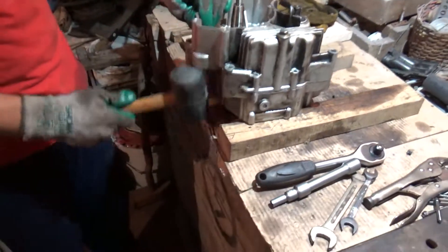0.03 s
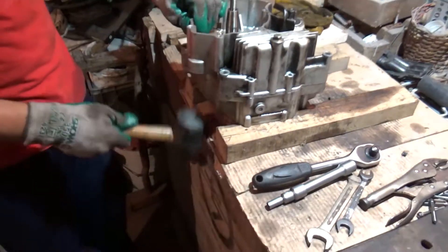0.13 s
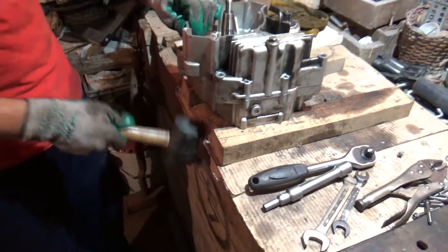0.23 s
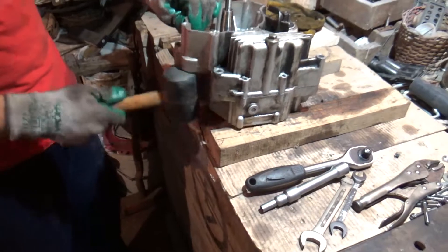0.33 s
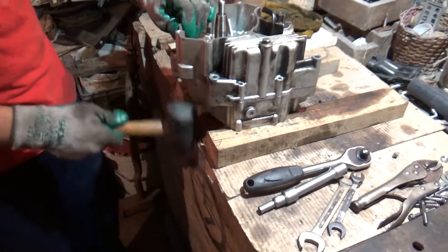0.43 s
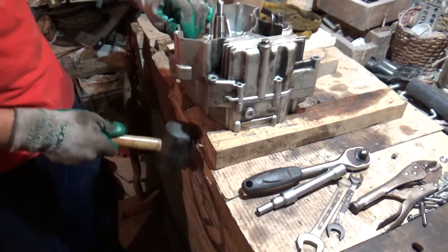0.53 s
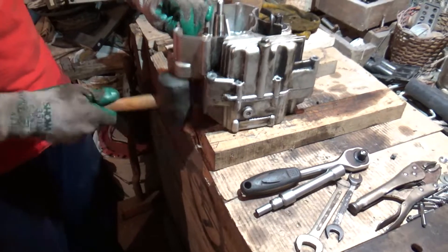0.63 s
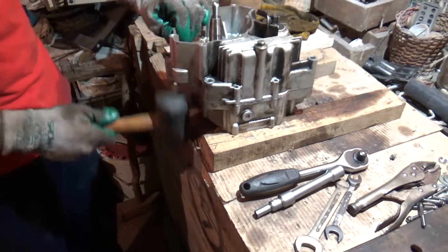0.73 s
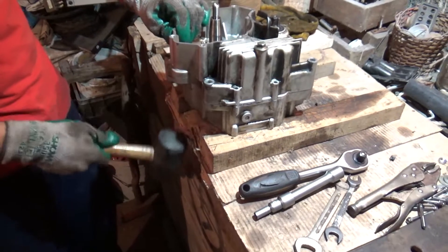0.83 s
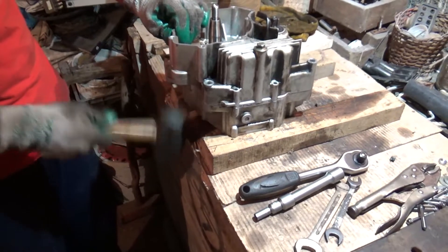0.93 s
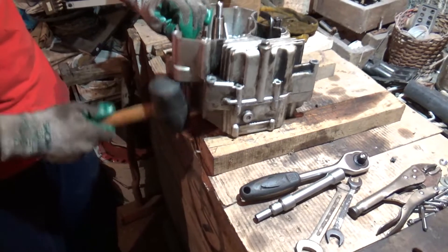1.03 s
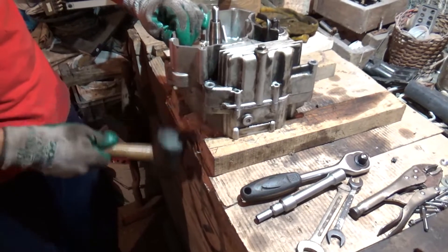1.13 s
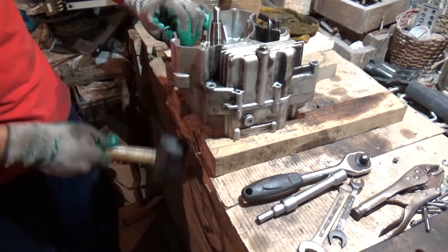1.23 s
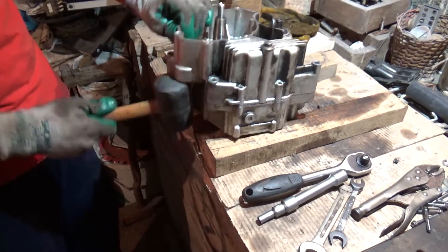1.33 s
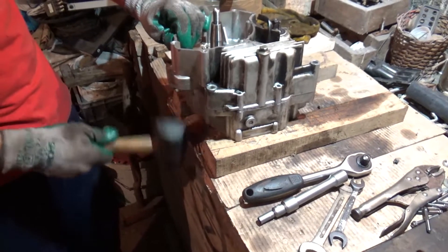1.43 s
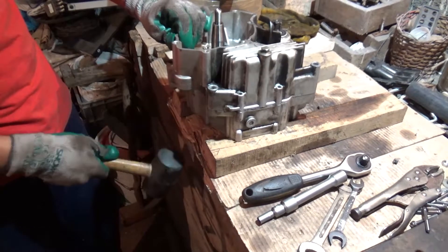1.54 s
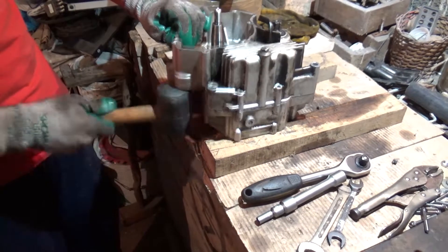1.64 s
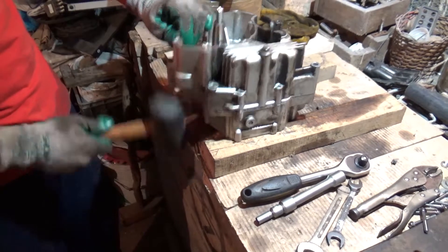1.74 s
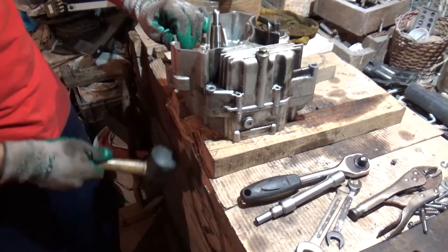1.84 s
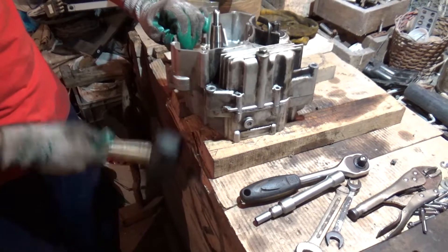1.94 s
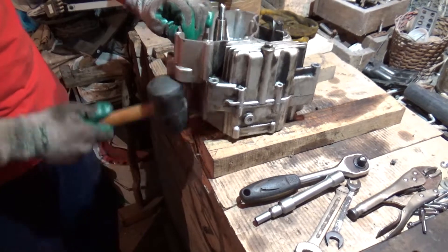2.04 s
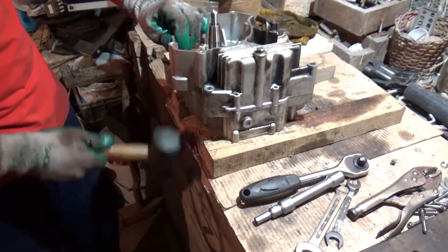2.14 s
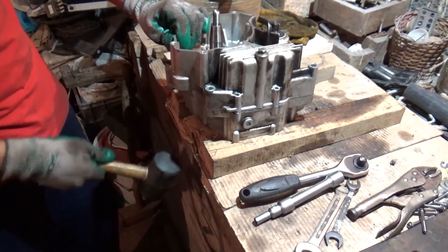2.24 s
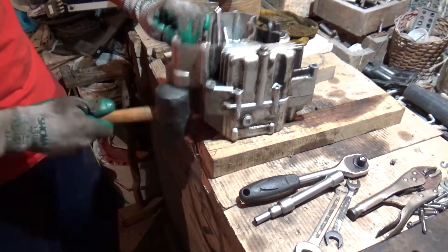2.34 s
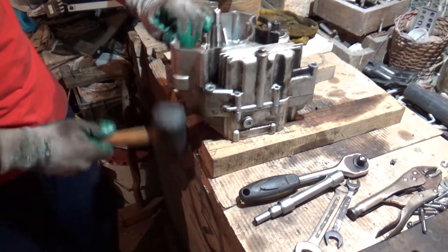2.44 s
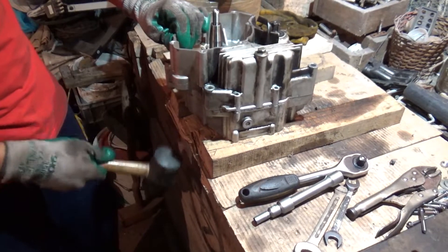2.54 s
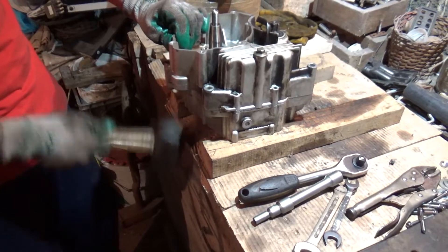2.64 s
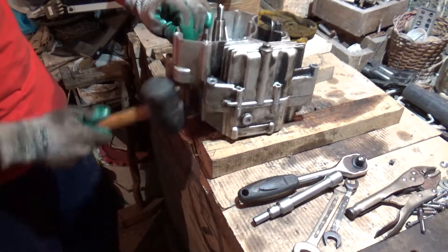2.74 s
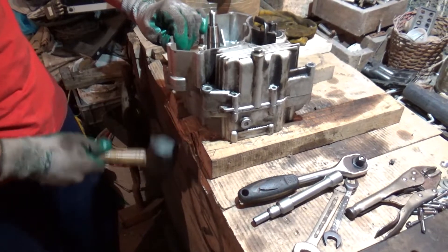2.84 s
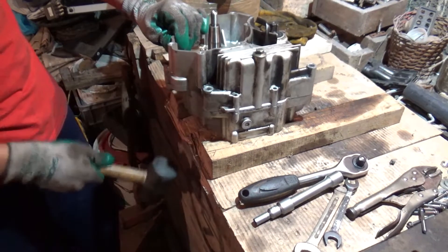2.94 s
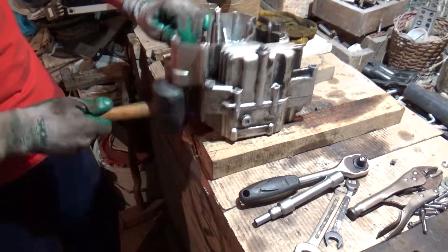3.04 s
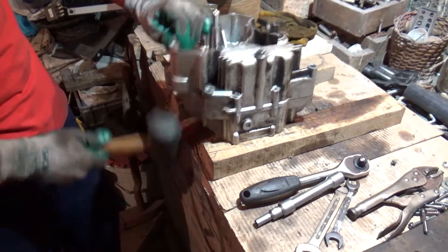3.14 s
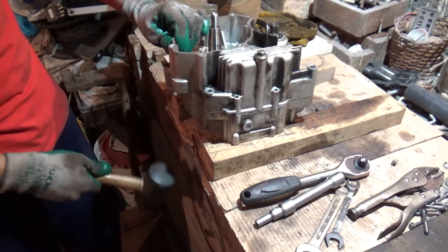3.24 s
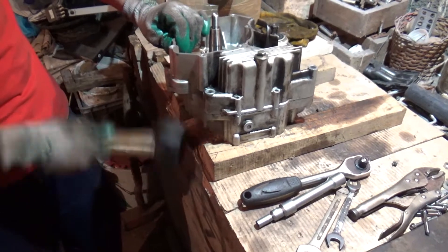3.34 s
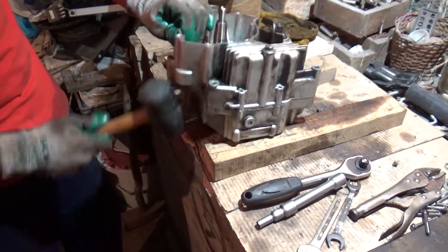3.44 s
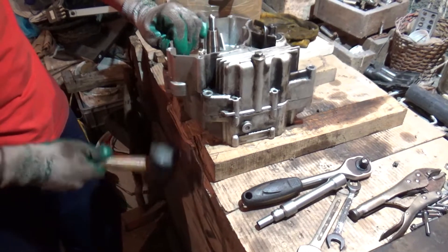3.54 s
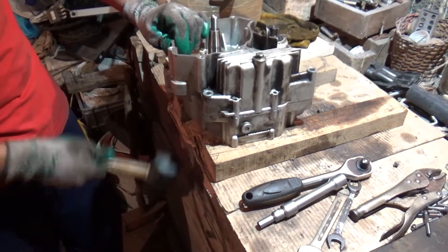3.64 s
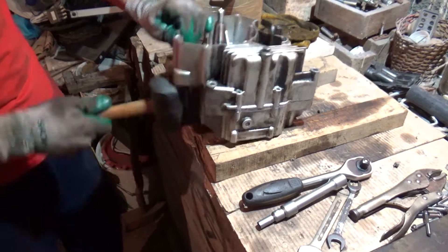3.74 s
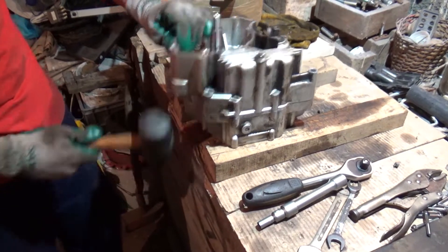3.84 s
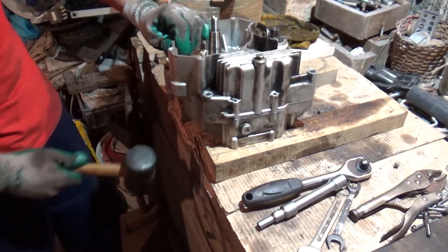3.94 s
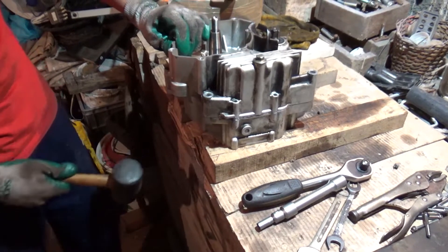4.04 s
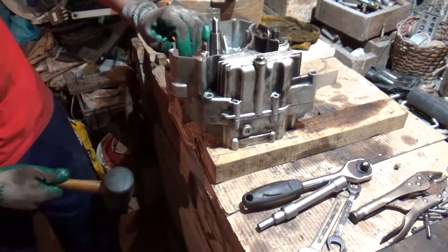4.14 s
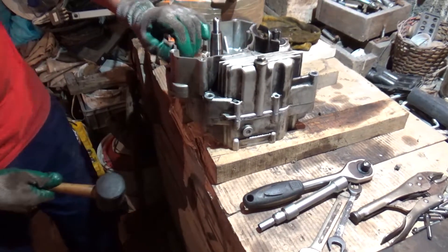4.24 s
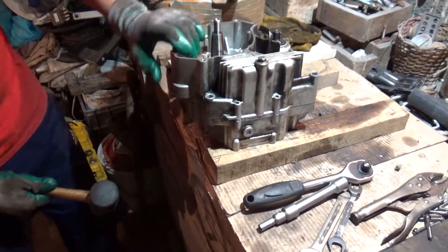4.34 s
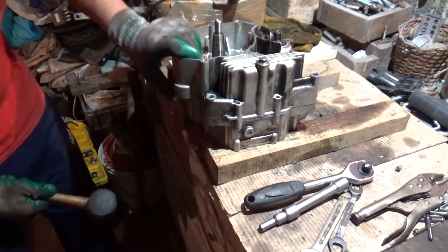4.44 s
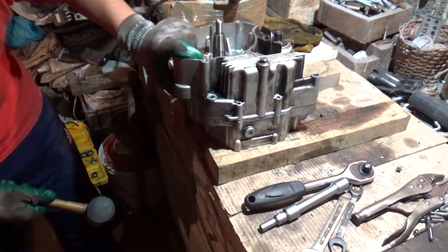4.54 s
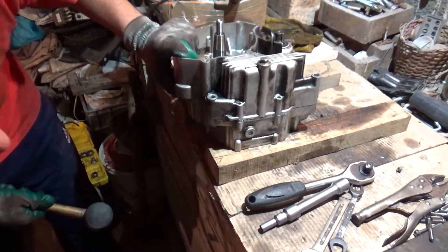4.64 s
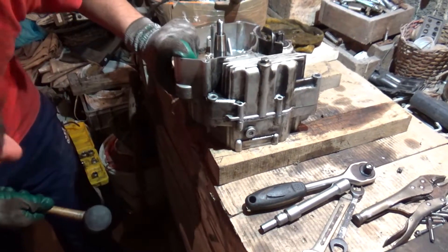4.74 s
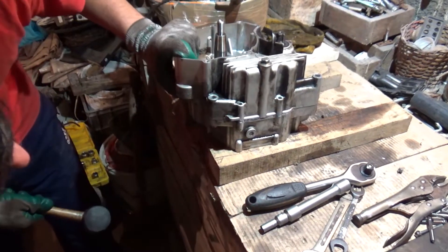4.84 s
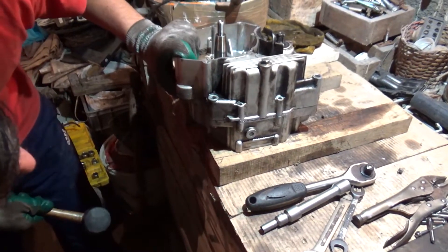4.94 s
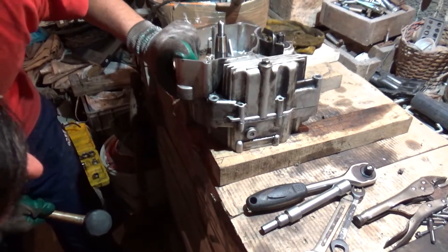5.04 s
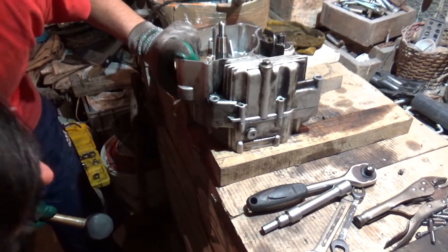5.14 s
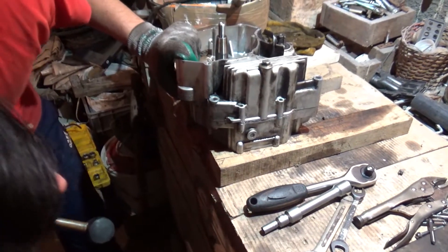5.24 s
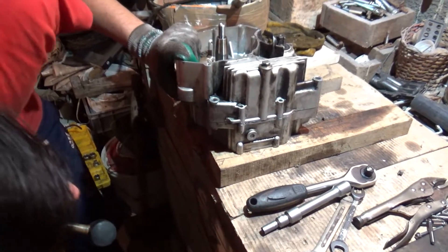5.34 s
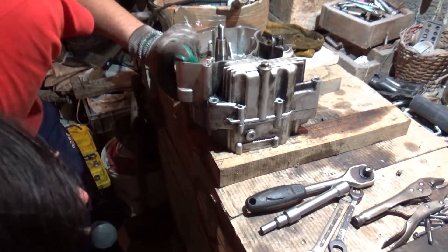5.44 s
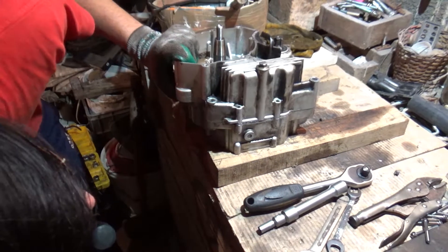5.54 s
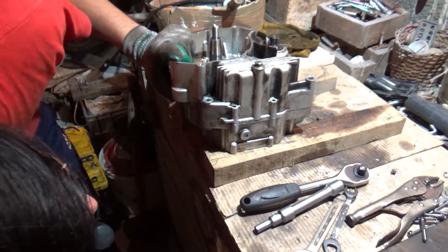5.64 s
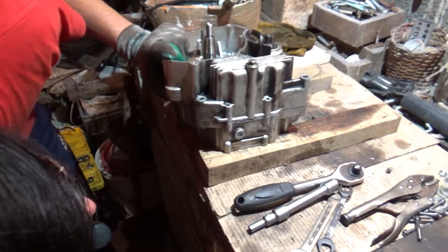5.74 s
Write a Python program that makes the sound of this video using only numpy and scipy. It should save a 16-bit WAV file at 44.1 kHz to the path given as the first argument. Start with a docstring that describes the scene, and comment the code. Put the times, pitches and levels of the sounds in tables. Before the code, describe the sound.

Twelve sharp mallet knocks on an aluminium casing, with steel clinks and wooden thuds, give way to faint glove rustling in a small workshop.

```python
"""A small workshop: a mallet knocks twelve times on an aluminium engine case that a gloved hand tips up
on a wooden bench. After each blow the case drops back on its wooden block; both impacts excite the
resonances of case and bench, and both throw the loose steel crankshaft against a stop, where it clinks.
Spanners rattle on the shaken bench and the glove shifts its grip, over the faint noise of still air.
A limiter flattens the loudest moments."""
import sys
import numpy as np
from scipy import signal
from scipy.fft import rfft, irfft
from scipy.io import wavfile
from scipy.ndimage import uniform_filter1d

SR = 44100
rng = np.random.default_rng(int(sys.argv[2]) if len(sys.argv) > 2 else 0)


def bounce(signal):
    """Save signal as a 16-bit WAV file at the path given by the first command-line argument."""
    frames = np.transpose(np.atleast_2d(signal))
    limited = np.clip(frames, -1, 1)
    pcm = np.round(limited * 32767).astype(np.int16)
    wavfile.write(sys.argv[1], SR, pcm)


N = 255427

# Mallet blows, and landings of the case on its block. Each row: start in seconds, relative level in dB,
# treble share in dB, relative level of the shaft's clink in dB, lift of its side modes by slant in dB.
BLOW_EVENTS = [(0.027, -10, -8, -10, 1), (0.354, -12.5, -4.5, -9.5, -1.5), (0.682, -12, -12, -14.5, 2.5),
               (1.025, -10, -11, -12, -1.5), (1.361, -9.5, -12.5, -15, 3.5), (1.695, -9, -15, -14, 2.5),
               (2.041, -9, -17, -11.5, 1.5), (2.385, -7, -19.5, -8.5, 0), (2.727, -7.5, -17, -12.5, -1),
               (3.078, -8.5, -17, -18, -5), (3.423, -10.5, -12, -11, -7.5), (3.758, -9.5, -12.5, -18, -4)]
DROP_EVENTS = [(0.112, -13.5, -28.5, -13.5, 3), (0.447, -14, -19, -11, -2), (0.778, -13.5, -12, -15, -0.5),
               (1.125, -12, -8, -13.5, -4.5), (1.465, -8.5, -25, -12, -3),
               (1.806, -8.5, -16.5, -10.5, -0.5), (2.149, -8, -13.5, -11.5, -3.5),
               (2.496, -10, -8, -11.5, 1), (2.841, -9, -11, -7, -1.5), (3.201, -9, -14, -13, -1),
               (3.550, -9, -14.5, -28, 11), (3.905, -12, -5.5, -18.5, 8)]
# Spectra of the contacts. Each row: frequency in Hz, relative spectral level in dB, early T60 in seconds.
BLOW_SPECTRUM = [(40, -41.5, 0.17), (99, -29, 0.81), (191, -31.5, 0.13), (343, -16.5, 0.29),
                 (500, -14.5, 0.37), (870, -10.5, 0.12), (1290, -11.5, 0.47), (2960, -15, 0.052),
                 (6500, -19, 0.068), (9300, -16.5, 0.16), (10950, -23, .09), (12700, -34, .08),
                 (16010, -44, .06)]
DROP_SPECTRUM = [(40, -51.5, 1), (82.4, -25.5, 0.8), (167, -20, 0.39), (340, -6.5, 0.22),
                 (415, -12.5, 0.015), (700, -2, 0.09), (1070, -4.5, 0.041), (2380, -9, 0.054),
                 (3980, -21, 0.025), (6350, -25.5, 0.045), (11000, -23, 0.049), (14600, -57.5, 0.018)]
CLINK_SPECTRUM = [(300, -29.5, .05), (2930, -7.5, 0.067), (8340, -15.5, 0.036), (9000, -2.5, .06),
                  (10100, -1.5, .06), (10700, -14.5, .04), (15090, -35, .03)]
TICK_SPECTRUM = [(40, -52.5, .05), (150, -26.5, .05), (350, -2, .05), (1200, 1.5, 0.029),
                 (2800, -0.5, 0.013), (6000, -6, 0.0072), (10900, -4.5, .008), (15000, -25, .008)]
# Resonances of the case on its bench. Each row: frequency in Hz, bandwidth in Hz, gain in dB.
CASE_RESONANCES = [(88, 14, 6), (135, 15, -1), (238, 30, -2), (345, 40, -4), (385, 20, -2), (423, 14, 12),
                   (615, 22, 2), (695, 20, -3), (760, 32, 1.5), (854, 46, 7), (954, 24, 4), (1046, 24, 4),
                   (1122, 26, 7), (1240, 30, -3), (1375, 30, -2), (1605, 35, 1), (1765, 25, -1),
                   (1805, 18, 1), (2110, 35, -6), (2350, 45, -3), (2630, 30, -5), (2756, 32, -1),
                   (3065, 50, -3), (3260, 120, 2), (4350, 150, -1), (4828, 35, 1)]
# Modes of the crankshaft, of block and bench top, and of a spanner.
# Each row: frequency in Hz, relative level in dB, T60 in seconds.
SHAFT_MODES = [(3480, -19, .11), (5443, -14, .095), (5835, -3, .095), (6597, -10, .09), (8043, -25, .12),
               (8789, 0, .085), (9300, -11, .08), (9356, -2, .08), (9975, -8, .075), (10022, -5, .105),
               (11665, -18, .1), (13350, -4, .075), (13717, -7, .07), (13952, -12, .08)]
WOOD_MODES = [(55, -30.5, 0.11), (88, -20.5, .2), (221.3, -14, .12), (357.9, -2.5, .13)]
SPANNER_MODES = [(2980, -3, .16), (3860, 2, .09), (3950, 1, .08), (4520, -10, .12), (6600, -5, .12),
                 (8120, 0, .07), (9700, -3, .06)]
# Excitation of the shaft at its far stop (after a blow) and its near stop (after a landing).
# Each row: frequency in Hz, gain in dB.
FAR_STOP_GAINS = [(6000, -19.5), (8800, -11.5), (9350, -9.5), (10000, -13.5), (13500, -19.5)]
NEAR_STOP_GAINS = [(6000, -14.5), (8800, -7), (9350, -6.5), (10000, -10), (13500, -17.5)]
# Single tools tipping over. Each row: start in seconds, relative level in dB, favoured frequency in Hz.
TOOL_TIPS = [(1.257, -32, 8100), (1.29, -37.5, 3300), (5.5, -51.5, 2850)]
# Slides of the glove on the case. Each row: midpoint in seconds, length in seconds, relative level in dB.
GLOVE_RUBS = [(0.261, 0.019, -36.5), (0.292, 0.026, -40), (4.269, 0.067, -55), (4.32, 0.061, -57),
              (4.544, 0.046, -59), (4.58, 0.36, -63)]
# Small handling ticks. Each row: start in seconds, relative level in dB.
HANDLING_TICKS = [(4.715, -50), (4.8274, -54.5)]
# Spectra of glove friction and still air. Each row: frequency in Hz, relative spectral level in dB.
GLOVE_SPECTRUM = [(88, -55.5), (150, -26), (352, -6), (681, -10.5), (736, -1), (1940, -3), (3760, -10.5),
                  (5650, -11.5), (9540, -4.5), (15500, -20)]
AIR_SPECTRUM = [(25, -25), (60, -18.5), (140, -13.5), (230, -6.5), (420, -4), (800, 0), (1200, -4),
                (2600, -6.5), (4000, -9.5), (10000, -15.5), (16000, -15.5)]
# Reverberation of the workshop. Each row: frequency in Hz, T60 in seconds.
ROOM_DECAY = [(80, .8), (400, 0.44), (1100, 0.33), (3000, 0.25), (8000, 0.34), (15000, 0.073)]
# Likeness of left and right, for contacts and for air and glove. Each row: frequency in Hz, coherence.
CONTACT_COHERENCE = [(60, .99), (250, .97), (500, .96), (1000, .9), (2000, .84), (4000, .88), (8000, .94),
                     (15000, .96)]
AIR_COHERENCE = [(60, 0.7), (240, 0.65), (950, 0.09), (3770, 0.34), (15000, 1)]
# Phase between the channels. Each row: frequency in Hz, lead of the left in radians.
LEFT_LEAD = [(60, .1), (250, .4), (600, .48), (2300, .2), (16000, 0)]

TAIL = int(.55 * SR) // 100 * 100   # samples in one contact's sound
TAIL_T = np.arange(TAIL) / SR
BUILD_CYCLES = 0.71   # vibration cycles that a contact takes to spread through case and bench
BOUNCE_S, BOUNCE_LOSS_DB = 0.065, 19   # the case rebounds after landing
JUMP_S, JUMP_LOSS_DB, JUMP_HZ = .104, 27.5, 4170   # the spanners jump after a landing
JITTER_S = 0.0046   # timing scatter of bounces and jumps
TRAVEL_TIGHT_S, TRAVEL_LOOSE_S, LOOSEN_S = .028, .0385, 1.5   # the shaft travels longer as it works loose
MAIN_LOW_HZ, MAIN_HIGH_HZ = 8500, 9500   # band of the shaft's main modes
PEEL_START_S, PEEL_GAP_S, PEEL_DB, PEEL_FADE_DB_PER_S = 4.2415, 0.0074, -32, 69


def mallet_blows():
    """Impulsive excitation: the mallet's brief contact drives the case over a broad band."""
    return knocks(BLOW_EVENTS, BLOW_SPECTRUM, room_db=-11, fresh_share=0.1, rise_s=.0016,
                  brightening=0.51, split_hz=2600, crack_db=-14, crack_s=0.0025)


def case_drops():
    """Inelastic collision: the case loses energy on landing and rebounds once, softly."""
    contacts = []
    for start, db, treble_db, *_ in DROP_EVENTS:
        rebound = start + BOUNCE_S + JITTER_S * rng.standard_normal()
        contacts += [(start, db, treble_db), (rebound, db - BOUNCE_LOSS_DB, treble_db)]
    return knocks(contacts, DROP_SPECTRUM, room_db=-21, fresh_share=0.61, rise_s=.0024,
                  brightening=0.48, split_hz=1500, crack_db=-15, crack_s=0.0071)


def knocks(events, spectrum, room_db, fresh_share, rise_s, brightening, split_hz, crack_db, crack_s):
    """Repeated impact: contacts at one spot sound alike, but each has its own loudness and brightness."""
    out = np.zeros((2, N))
    shared = burst(spectrum, room_db)
    usual_treble_db = np.median(np.array(events)[:, 2])
    crack = 1 + from_db(crack_db) * np.exp(-TAIL_T / crack_s)
    lowpass = signal.butter(1, split_hz, fs=SR, output="sos")
    for start, db, treble_db, *_ in events:
        fresh = burst(spectrum, room_db)
        hit = onset(rise_s) * (np.sqrt(1 - fresh_share) * shared + np.sqrt(fresh_share) * fresh)
        low = signal.sosfilt(lowpass, hit)
        treble_gain = crack * from_db(brightening * (treble_db - usual_treble_db))
        add(out, start, from_db(db) * (low + treble_gain * (hit - low)))
    return out


def case_body(drive):
    """Resonance: case and bench reinforce the vibration near their natural frequencies."""
    out = drive
    for hz, bandwidth, db in CASE_RESONANCES:
        radius = np.exp(-np.pi * bandwidth / SR)
        forward = np.array([1, 0, -1]) * (1 - radius ** 2) / 2
        feedback = [1, -2 * radius * np.cos(2 * np.pi * hz / SR), radius ** 2]
        out = out + from_db(db) * signal.lfilter(forward, feedback, drive + 1e-18)
    return out


def crankshaft(jolts, stop_gains, lag_s, chatter_db, room_db, ring_db=17):
    """Modal excitation: steel chatters on steel and rings; a slanting contact lifts the side modes."""
    out = np.zeros((2, N))
    hz = np.array(SHAFT_MODES)[:, 0]
    side_modes = (hz < MAIN_LOW_HZ) | (hz > MAIN_HIGH_HZ)
    for start, _, _, db, slant_db in jolts:
        weights_db = at_hz(stop_gains, hz)[0] + slant_db * side_modes
        tone = ring(SHAFT_MODES, weights_db, room_db, spread_db=1.5, waver=.3, waver_hz=200)
        chatter = from_db(slant_db / 2) * burst(CLINK_SPECTRUM, room_db=-27.5)
        clink = from_db(ring_db) * tone + from_db(chatter_db) * chatter
        travel_s = TRAVEL_LOOSE_S - (TRAVEL_LOOSE_S - TRAVEL_TIGHT_S) * np.exp(-start / LOOSEN_S)
        add(out, start + travel_s + lag_s, from_db(db) * onset(rise_s=.0018) * clink)
    return out


def wood_thumps(thump_db, rise_s):
    """Damped vibration: each landing sets the low modes of block and bench top thumping."""
    out = np.zeros((2, N))
    for start, db, *_ in DROP_EVENTS:
        thump = ring(WOOD_MODES, np.zeros(len(WOOD_MODES)), room_db=-24,
                     spread_db=1.2, waver=.15, waver_hz=40)
        add(out, start, from_db(db + thump_db) * onset(rise_s) * thump)
    return out


def spanners(ring_db, tick_db, falloff_db_per_octave):
    """Structure-borne vibration: landings make loose tools jump, tick and ring; a few tip over alone."""
    out = np.zeros((2, N))
    mode_hz = np.array(SPANNER_MODES)[:, 0]
    jumps = [(start + JUMP_S + JITTER_S * rng.standard_normal(), db - JUMP_LOSS_DB, JUMP_HZ)
             for start, db, *_ in DROP_EVENTS]
    for start, db, favoured_hz in jumps + list(TOOL_TIPS):
        weights_db = -falloff_db_per_octave * abs(np.log2(mode_hz / favoured_hz))
        tone = ring(SPANNER_MODES, weights_db, room_db=-29.5, spread_db=5.5, waver=0.1, waver_hz=180)
        tick = burst(TICK_SPECTRUM, room_db=-23)
        rattle = from_db(ring_db) * tone + from_db(tick_db) * tick
        add(out, start, from_db(db) * onset(rise_s=0.00023) * rattle)
    return out


def glove(tick_db, grain_db, snap_count):
    """Friction and adhesion: the rubber palm slides with a grainy hiss and peels off in fading snaps."""
    t = np.arange(N) / SR
    grain = unit_rms(uniform_filter1d(rng.standard_normal(N), size=90))
    slide = sum(from_db(db) * np.exp(-(2 * (t - middle) / length) ** 2)
                for middle, length, db in GLOVE_RUBS)
    out = slide * from_db(grain_db * grain) * stereo_noise(N, AIR_COHERENCE, GLOVE_SPECTRUM)
    gaps = PEEL_GAP_S * (.5 + rng.random(snap_count))
    delays = np.cumsum(gaps) - gaps[0]
    snaps = [(PEEL_START_S + delay, PEEL_DB - PEEL_FADE_DB_PER_S * delay) for delay in delays]
    for start, db in snaps + list(HANDLING_TICKS):
        add(out, start, from_db(db + tick_db) * burst(TICK_SPECTRUM, room_db=-20.5))
    return out


def still_air(level_db):
    """Stationary noise: the quiet room is a faint, steady broadband hush."""
    return from_db(level_db) * stereo_noise(N, AIR_COHERENCE, AIR_SPECTRUM)


def burst(spectrum, room_db):
    """Modal overlap: crowded modes act as decaying noise, lows building last; rms 1 in the first 10 ms."""
    hz = np.fft.rfftfreq(TAIL, 1 / SR)
    noise = rfft(stereo_noise(TAIL, CONTACT_COHERENCE))
    centres = np.geomspace(60, 15000, 9)
    decaying = 0
    for centre, selector in zip(centres, np.eye(len(centres))):
        band = irfft(noise * np.interp(hz, centres, selector), TAIL)
        build = 1 - np.exp(-TAIL_T * centre / BUILD_CYCLES)
        early = from_db(-60 * TAIL_T / at_hz(spectrum, centre)[1])
        decaying = decaying + band * build * np.hypot(early, room_decay(centre, room_db))
    # Whiten the noise, then give it the contact's spectrum.
    bins = rfft(decaying)
    power = uniform_filter1d(np.mean(abs(bins) ** 2, axis=0), size=27)
    coloured = irfft(bins / np.sqrt(power + 1e-12) * from_db(at_hz(spectrum, hz)[0]), TAIL)
    faded = coloured * np.clip(5 - 6 * TAIL_T / TAIL_T[-1], 0, 1)
    return faded / np.sqrt(np.mean(faded[:, :SR // 100] ** 2))


def ring(modes, weights_db, room_db, spread_db, waver, waver_hz):
    """Superposition of damped modes: chatter and reflections make each waver, unequally left and right."""
    out = 0
    for (hz, db, t60), weight_db in zip(modes, weights_db):
        decay = from_db(-60 * TAIL_T / t60) + room_decay(hz, room_db)
        knots = rng.standard_normal((2, 400)) + 1j * rng.standard_normal((2, 400))
        scatter = np.array([np.interp(TAIL_T * waver_hz, np.arange(len(k)), k) for k in knots])
        scatter = scatter + scatter[::-1] / 2   # partly shared by the channels
        wave = np.real((1 + waver * scatter) * np.exp(2j * np.pi * (hz * TAIL_T + rng.random())))
        gain = from_db(db + weight_db + spread_db * rng.standard_normal((2, 1)))
        out = out + gain * decay * wave
    return out


def onset(rise_s):
    """Finite rise time: a contact builds up smoothly over a moment."""
    return 1 - np.exp(-(TAIL_T / rise_s) ** 2)


def room_decay(hz, room_db):
    """Reverberation: the room's envelope falls 60 dB in one T60, which depends on frequency."""
    return from_db(room_db - 60 * TAIL_T / at_hz(ROOM_DECAY, hz)[0])


def stereo_noise(size, coherence, spectrum=None):
    """Partial coherence: two nearby points share much of their noise, the left leading; rms 1."""
    hz = np.fft.rfftfreq(size, 1 / SR)
    mid, side = rfft(rng.standard_normal((2, size)))
    alike = np.clip(at_hz(coherence, hz)[0], 0, 1)
    sign = np.array([[1], [-1]])
    pair = np.sqrt(1 + alike) * mid + np.sqrt(1 - alike) * side * sign
    phase_shift = np.exp(.5j * sign * at_hz(LEFT_LEAD, hz)[0])
    colour = 1 if spectrum is None else from_db(at_hz(spectrum, hz)[0])
    return unit_rms(irfft(pair * phase_shift * colour, size))


def from_db(db):
    """Decibels to amplitude ratio."""
    return 10 ** (np.asarray(db) / 20)


def unit_rms(x):
    """Normalisation to rms 1."""
    return x / np.sqrt(np.mean(x ** 2) + 1e-20)


def at_hz(rows, hz):
    """Interpolation of a table's columns on a log-frequency axis."""
    freqs, *columns = np.transpose(rows)
    return [np.interp(np.log(hz + 1), np.log(freqs + 1), column) for column in columns]


def add(out, start_s, sound):
    """Superposition of a sound on the mix at its start time."""
    start = max(round(start_s * SR), 0)
    out[:, start:start + sound.shape[1]] += sound[:, :N - start]


def limiter(x, ceiling_db, release_db_per_s, treble_db):
    """Gain control: the gain ducks above the ceiling, sooner for bright sounds, and recovers steadily."""
    sensed = x ** 2 + (from_db(treble_db) * np.diff(x, prepend=0)) ** 2
    power = uniform_filter1d(np.mean(sensed, axis=0), size=132)
    excess_db = np.maximum(10 * np.log10(np.maximum(power, 1e-12)) - ceiling_db, 0)
    recovery_db = release_db_per_s * np.arange(N) / SR
    duck_db = np.maximum.accumulate(excess_db + recovery_db) - recovery_db
    return x * from_db(-uniform_filter1d(duck_db, size=64))


def scene():
    """Linear superposition: the sounds of case, shaft, bench, tools, glove and air add together."""
    case = case_body(from_db(-1.5) * mallet_blows() + from_db(-7) * case_drops())
    thrown = crankshaft(BLOW_EVENTS, FAR_STOP_GAINS, lag_s=0, chatter_db=-7, room_db=-40.5)
    # The shaft slides back more slowly than it is thrown.
    returned = crankshaft(DROP_EVENTS, NEAR_STOP_GAINS, lag_s=.0012, chatter_db=-4, room_db=-42)
    shaft = (thrown + returned) * from_db([[-0.92], [0.92]])   # slightly to the right
    bench = wood_thumps(thump_db=-8, rise_s=0.0099)
    tools = spanners(ring_db=-9, tick_db=-12, falloff_db_per_octave=17)
    grip = glove(tick_db=-13.5, grain_db=2, snap_count=8)
    return case + shaft + bench + tools + grip + still_air(level_db=-64.5)


def record(dry):
    """Limiting of level and bandwidth: the peaks are held down and a steep low-pass cuts the top."""
    held = limiter(dry, ceiling_db=-14, release_db_per_s=430, treble_db=-3.5)
    cutoff_hz = 15600
    return signal.sosfilt(signal.ellip(10, .1, 80, cutoff_hz, fs=SR, output="sos"), held)


dry = scene()
out = record(dry)
bounce(out)
```